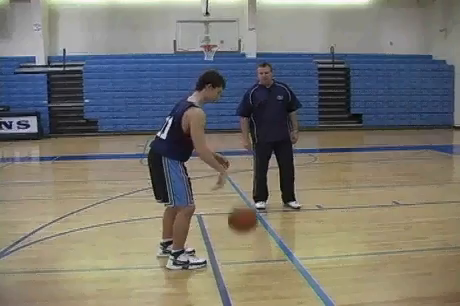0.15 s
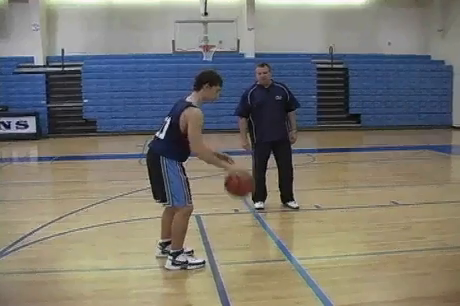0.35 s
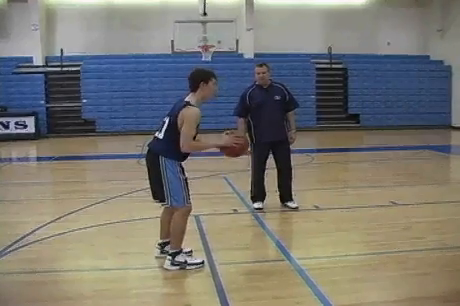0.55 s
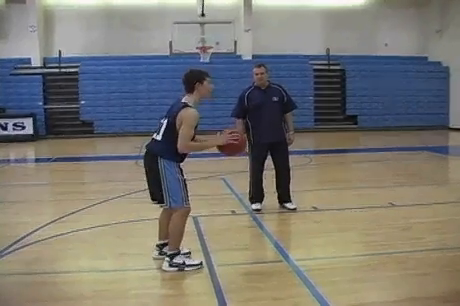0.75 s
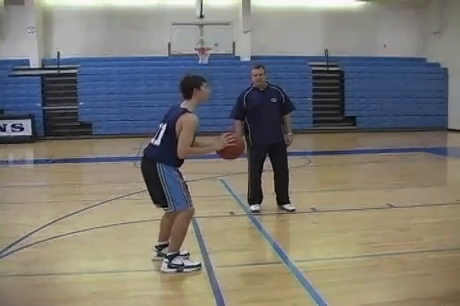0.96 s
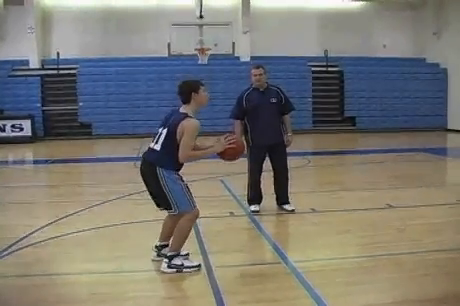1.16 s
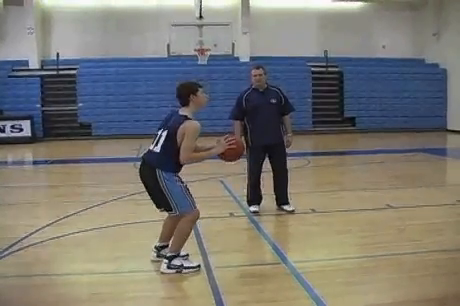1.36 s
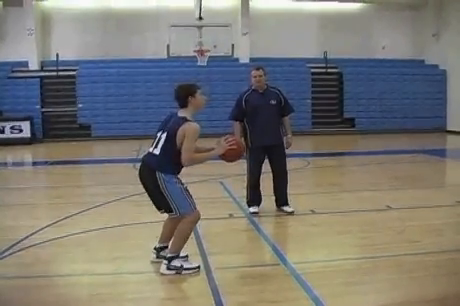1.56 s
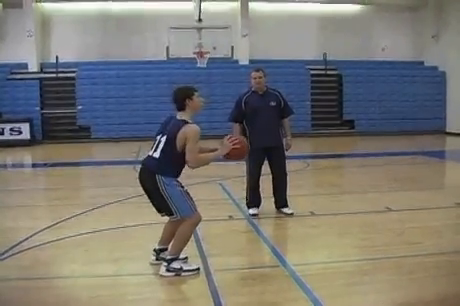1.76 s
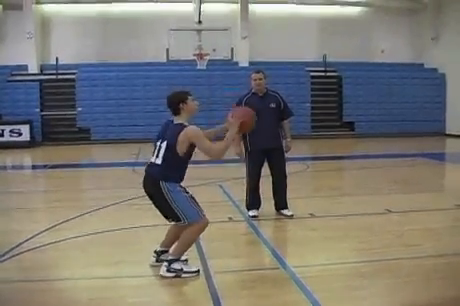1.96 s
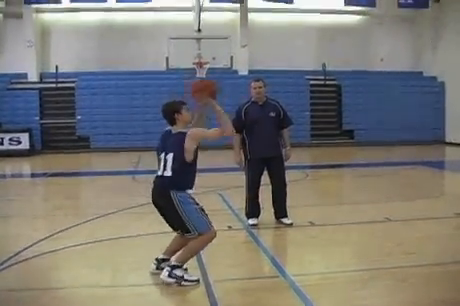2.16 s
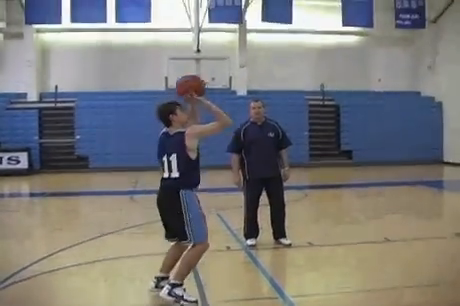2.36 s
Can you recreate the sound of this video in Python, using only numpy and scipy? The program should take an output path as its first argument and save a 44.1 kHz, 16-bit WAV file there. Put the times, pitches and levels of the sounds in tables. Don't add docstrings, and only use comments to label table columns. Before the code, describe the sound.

A basketball bounces once on a hardwood floor at about 0.23 seconds: a boomy thump, crisp slap and short hollow ring. Before it, the fading reverberation of an earlier bounce and a faint dull palm tap at 0.12. Quick wall echoes follow until about 0.7, then a long gym tail fades to 2.4 seconds over soft lamp buzz, low ventilation and barely audible finger ticks, the loudest near 1.4.

```python
import sys
import numpy as np
from scipy import signal
from scipy.io import wavfile

SR = 44100
rng = np.random.default_rng(int(sys.argv[2]) if len(sys.argv) > 2 else 0)


def wrap_up_sound(samples):
    columns = np.atleast_2d(samples).T
    tamed = np.clip(columns, -1, 1)
    steps = np.round(tamed * 32767).astype(np.int16)
    wavfile.write(sys.argv[1], SR, steps)


def undo_db(level):
    steps = np.asarray(level, float) / 20
    return 10 ** steps


N = 105840

BOUNCE_S, EARLIER_S, EARLIER_DB = 0.2326, -0.49, 0.5

# pitch_hz, level_db (per Hz)
TAIL_COLOUR = [(24, -70), (40, -40), (79, -6), (118, -2), (243, -20.5), (680, -29), (1150, -23),
               (8550, -41), (16000, -55)]
# pitch_hz, fall_60db_s
GYM_DECAY = [(60, 4.4), (160, 1.4), (420, 2.03), (1100, 2.42), (2900, 3.14), (6000, 2.56), (8500, 1.58),
             (11000, 1.33), (15000, .8)]
# pitch_hz, width_hz, level_db
TAIL_RING = [(1114, 213, 3), (2240, 20, -47), (4480, 140, -16)]
# multiple (of the buzz rate), level_db (rms)
LAMPS = [(2, -79), (3, -77), (4, -77), (5, -76), (6, -79), (7, -68.5), (8, -94), (9, -88.5),
         (10, -72.5), (11, -76.5), (12, -69.5), (13, -82.5), (14, -79.5), (15, -78.5), (16, -92),
         (17, -81), (18, -87), (19, -80), (20, -78), (21, -86.5), (22, -74.0), (23, -72.5), (24, -83.5),
         (25, -109), (26, -87), (27, -90), (28, -94), (29, -83), (30, -98), (31, -79),
         (32, -81.0), (33, -80), (34, -105), (35, -80.5), (36, -81), (37, -96), (38, -80.5),
              (39, -80.5), (40, -83), (41, -122), (42, -78), (43, -122), (44, -89), (45, -84.5),
              (46, -88.5), (47, -90), (48, -83), (49, -79), (50, -81), (51, -109), (52, -100), (53, -78),
              (54, -79.5), (55, -103), (56, -95), (57, -81.0), (58, -102.0), (59, -85.5), (60, -92),
              (61, -102),
         (65, -106.0), (66, -84), (67, -91), (68, -82), (69, -101), (70, -102.0), (71, -97), (72, -106),
             (73, -85), (74, -88), (75, -98)]
# pitch_hz, level_db (per Hz)
AIR_COLOUR = [(18, -47), (30, -4.5), (106, 4), (540, -21.5), (844, -22), (913, -19.5), (2680, -28.5),
              (3060, -25.5), (16000, -39.5)]
# start_s, level_db, centre_hz, fall_60db_s
TICKS = [
    (.077, -62, 13000, .02),
    (.143, -67, 14000, .03),
    (.178, -71, 9000, 0.027),
    (1.155, -66, 9000, .02),
    (1.255, -64, 10000, .02),
    (1.408, -49, 2750, 0.023),
    (2.044, -64, 7000, .02),
    (2.368, -60, 4200, 0.036),
    (2.367, -59, 1800, 0.044),
    (2.367, -66, 11500, .04),
]
# pitch_hz, level_db, fall_60db_s
FLOOR = [(102.2, 3, 0.054), (125.5, -6.5, 0.074), (239, -5, 0.053), (366.6, -6, 0.041), (409.6, -17, 0.11),
         (556, -15.5, 0.044)]
# pitch_hz, level_db, fall_60db_s
BALL = [(780, 9, 0.037), (979.6, 11.5, 0.16), (1200, -12, 0.18), (1620, -6, 0.08), (2196, 0, 0.19),
        (2747, -2.5, 5.0), (3560, -34, 0.11), (3680, -7, 0.19), (4100, -1, 5.0), (5250, -30.5, 0.2),
        (6250, -41, 5.0)]
# after_touch_s, level_db, centre_hz, fall_60db_s
SLAPS = [(.0001, -32, 7900, 0.026), (.0003, -41, 13600, 0.025), (.0002, -26.5, 4000, 0.024),
         (.0004, -21, 1200, 0.037), (.002, -22.5, 780, .05), (.0078, -28, 4200, 0.016),
         (.008, -60, 11000, 0.013), (0.0092, -25.5, 7150, 0.0098), (.0113, -31, 3230, 0.021),
         (0.009, -29, 1170, 0.05), (0.015, -47.5, 9000, .08), (0.022, -39, 5500, 0.035),
         (.0245, -54, 11200, .06)]
# delay_s, level_db
THUMP_ECHOES = [(.057, -8), (0.08, -23), (0.111, -29), (.119, -14.5), (0.14, -36), (.179, -13),
                (0.194, -11.5), (0.243, -43), (0.28, -23), (.318, -21), (0.363, -32), (0.512, -30)]
# low_hz, high_hz
ECHO_THUMP_HZ = [81, 166]
# delay_s, level_db
SLAP_ECHOES = [
    (.0515, -7),
    (.0855, -14),
    (.103, -17),
]
# start_s, level_db, centre_hz, fall_60db_s
GLINTS = [
    (.2841, -41, 12500, .035),
    (.2842, -38, 3000, .03),
    (.3086, -41, 12500, .04),
    (.318, -35, 4500, .02),
    (.3182, -42, 10000, .02),
]


def at_hz(points, hz):
    pitch_hz, value = np.array(points).T
    return np.interp(np.log(hz), np.log(pitch_hz), value)


def drift(rate):
    r = np.exp(-80 * np.pi * rate / SR)
    slow = signal.lfilter([1], [1, -2 * r, r * r], rng.standard_normal(N // 40 + 2002))[2000:]
    return np.interp(np.arange(N) / 40, np.arange(len(slow)), slow / slow.std())


def dying(start, t60, rise):
    t = np.maximum(np.arange(N) / SR - start, 0)
    return (1 - np.exp(-t / max(rise, 1e-5))) * undo_db(-60 * t / t60)


def mode(start, hz, db, t60, rise):
    t = np.arange(N) / SR - start
    return undo_db(db) * dying(start, t60, rise) * np.sin(2 * np.pi * hz * t)


def burst(start, db, hz, t60):
    edges = [hz / 1.4, min(hz * 1.4, 0.45 * SR)]
    sos = signal.butter(3, edges, "band", fs=SR, output="sos")
    noise = signal.sosfilt(sos, rng.standard_normal(N))
    return undo_db(db) * noise / noise.std() * dying(start, t60, 0.0002 + 1.2 / hz)


def echoes(x, table):
    n = np.arange(N)
    return sum(undo_db(db) * np.interp(n - delay * SR, n, x, left=0) for delay, db in table)


def bands(spectrum, patchy_db):
    edges = 28 * 2 ** np.arange(0, 9.4, 1 / 3)
    centres = np.sqrt(edges[1:] * edges[:-1])
    white = rng.standard_normal((2, N + 8000))
    out = []
    for k, hz in enumerate(centres):
        sos = signal.butter(2, edges[k:k + 2], "band", fs=SR, output="sos")
        noise = signal.sosfilt(sos, white[k % 2])[8000:]
        level = undo_db(at_hz(spectrum, hz) + patchy_db * drift(10.8))
        out.append(level * noise)
    out = np.array(out)
    return centres, out / out.sum(0).std()


def tail():
    start_s, rise_s = 0.0518, 0.012
    centres, noise = bands(TAIL_COLOUR, 0.76)
    blur = 0
    for hz, band in zip(centres, noise):
        t60 = at_hz(GYM_DECAY, hz)
        now = dying(BOUNCE_S + start_s, t60, rise_s)
        before = dying(EARLIER_S, t60, rise_s)
        blur = blur + band * np.hypot(now, undo_db(EARLIER_DB) * before)
    rings, top_db = 0, max(db for _, _, db in TAIL_RING)
    for hz, width, db in TAIL_RING:
        r = np.exp(-np.pi * width / SR)
        feed = [(1 - r * r) / 2, 0, (r * r - 1) / 2]
        back = [1, -2 * r * np.cos(2 * np.pi * hz / SR), r * r]
        rings = rings + undo_db(-2.5 + 0.6 * (db - top_db)) * signal.lfilter(feed, back, blur)
    return undo_db(-30.5) * (blur + rings)


def lamps():
    buzz_hz, rest_db, spread_db, waver_db = 119.96, -103, 5, 1.0
    order = np.arange(1, 100)
    db = rest_db + spread_db * rng.standard_normal(len(order))
    for multiple, level_db in LAMPS:
        db[int(round(multiple)) - 1] = level_db
    phase = rng.uniform(0, 2 * np.pi, len(order))
    t = np.arange(N) / SR
    waver = [undo_db(waver_db * drift(1.0)) for _ in range(6)]
    buzz = 0
    for k, multiple in enumerate(order):
        tone = np.sin(2 * np.pi * buzz_hz * multiple * t + phase[k])
        buzz = buzz + np.sqrt(2) * undo_db(db[k]) * waver[k % 6] * tone
    return buzz


def ventilation():
    level_db, patchy_db = -57, -1.2
    return undo_db(level_db) * bands(AIR_COLOUR, patchy_db)[1].sum(0)


def hands():
    tap_s, tap_db, width_s = 0.1247, -29, 0.0003
    tap = -undo_db(tap_db) * np.exp(-((np.arange(N) / SR - tap_s) / width_s) ** 2)
    return tap + sum(burst(*tick) for tick in TICKS)


def thump():
    rise_s, lag_at_100_hz_s = 0.0046, 0.0042
    out = 0
    for hz, db, t60 in FLOOR:
        start = BOUNCE_S + lag_at_100_hz_s * np.sqrt(100 / hz)
        out = out + mode(start, hz, db, t60, rise_s)
    return out


def ball_ring():
    level_db, longest_s, rough_db = -38, 0.14, 3
    out = 0
    for hz, db, t60 in BALL:
        tone = mode(BOUNCE_S + 0.00204, hz, db + level_db, min(t60, longest_s), 0.0069)
        out = out + undo_db(rough_db * drift(62.5)) * tone
    return out


def cover_slap():
    return sum(burst(BOUNCE_S + after, db, hz, t60) for after, db, hz, t60 in SLAPS)


def walls(low, high):
    sos = signal.butter(2, ECHO_THUMP_HZ, "band", fs=SR, output="sos")
    dull = signal.sosfilt(sos, low)
    glints = sum(burst(*glint) for glint in GLINTS)
    return echoes(dull, THUMP_ECHOES) + echoes(high, SLAP_ECHOES) + glints


def scene():
    room = tail() + lamps() + ventilation() + hands()
    low = thump()
    high = ball_ring() + cover_slap()
    return (room + low + high + walls(low, high))[None]


def band_limit(x):
    return signal.sosfilt(signal.butter(12, 16460, fs=SR, output="sos"), x)


def record(dry):
    low_cut = signal.butter(3, 73.5, "high", fs=SR, output="sos")
    high_cut = signal.cheby2(20, 60, 16120, fs=SR, output="sos")
    mix = signal.sosfilt(high_cut, signal.sosfilt(low_cut, dry))
    return band_limit(mix)


dry = scene()
out = record(dry)
wrap_up_sound(out)
```